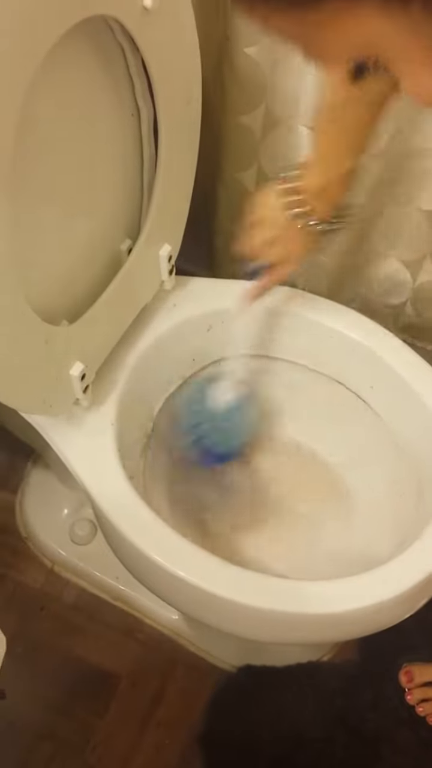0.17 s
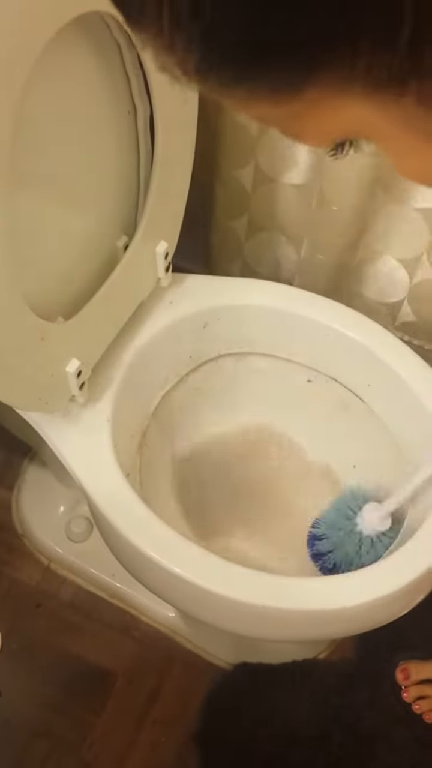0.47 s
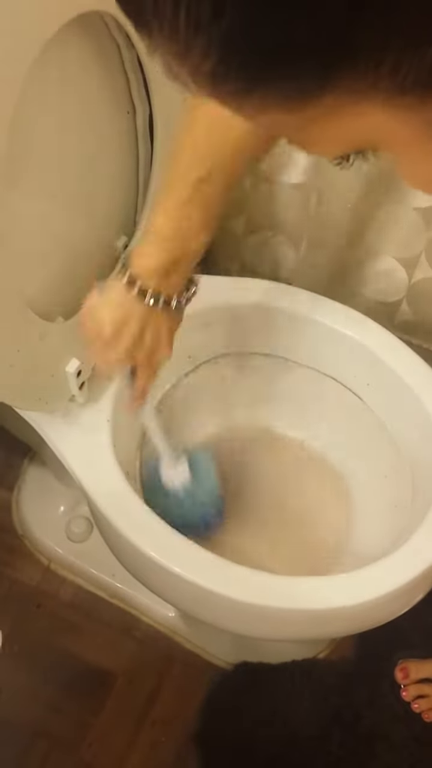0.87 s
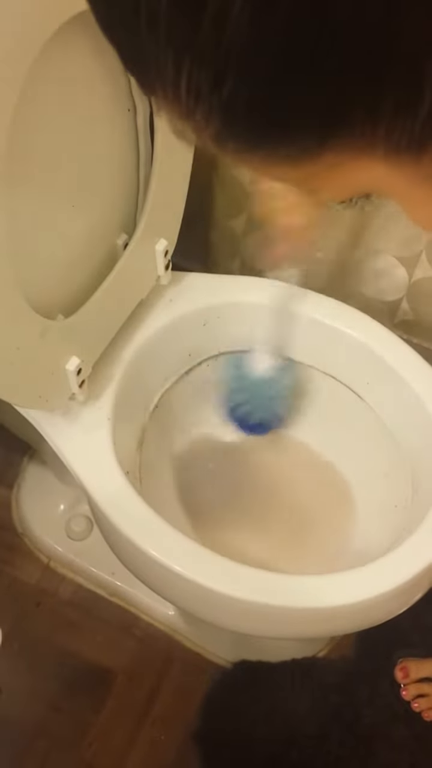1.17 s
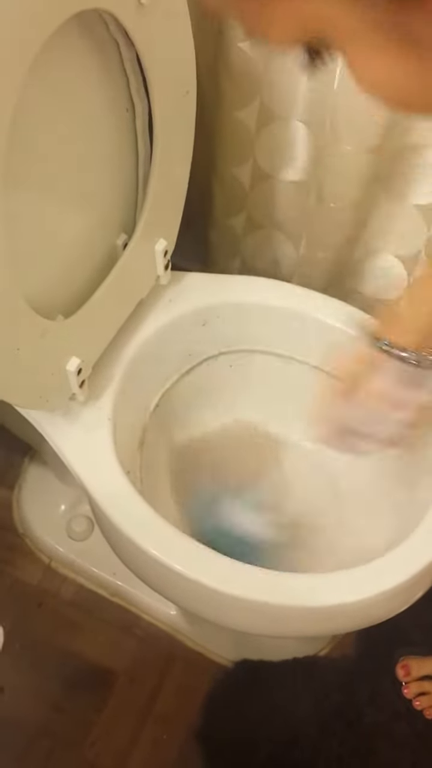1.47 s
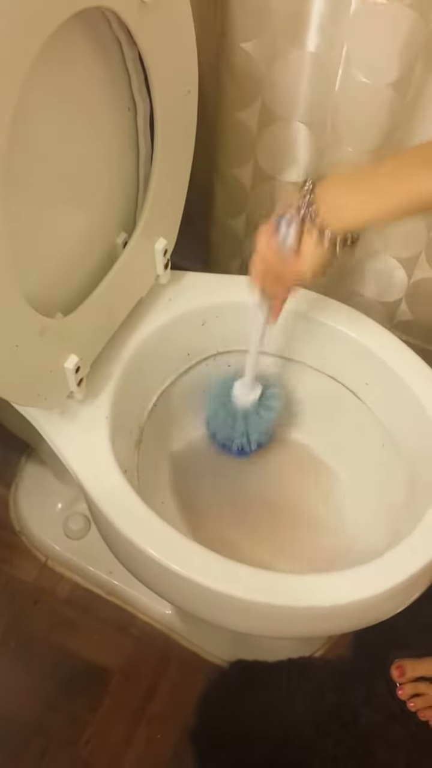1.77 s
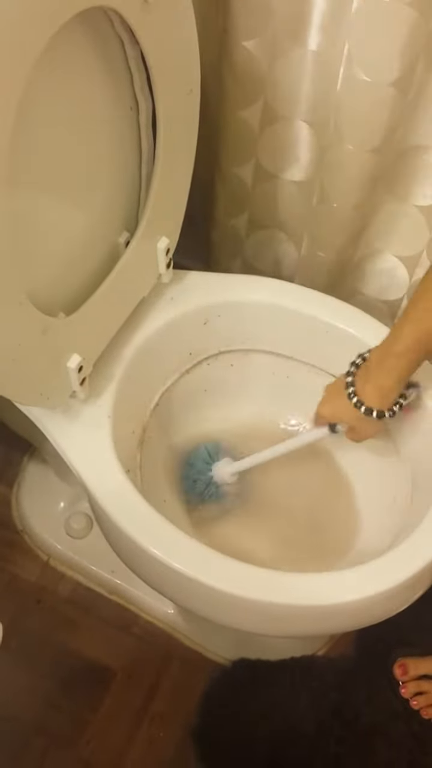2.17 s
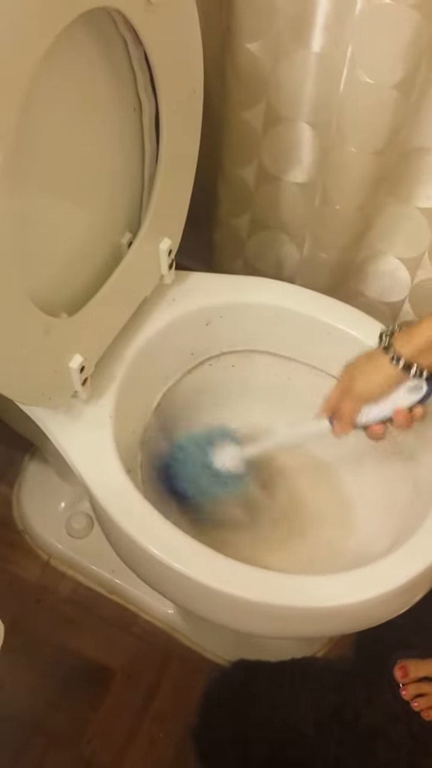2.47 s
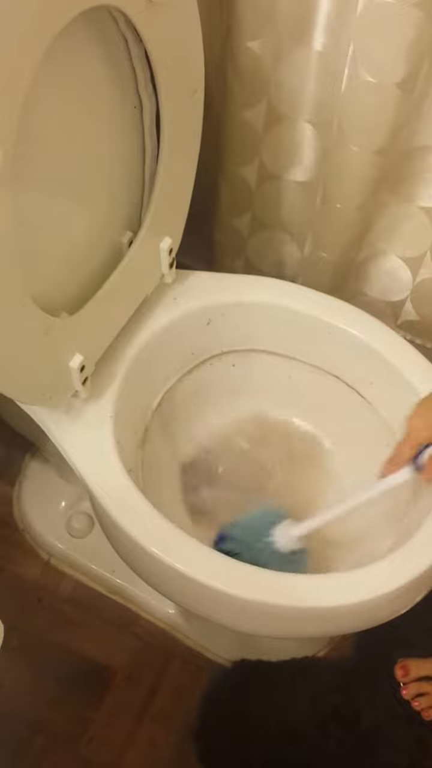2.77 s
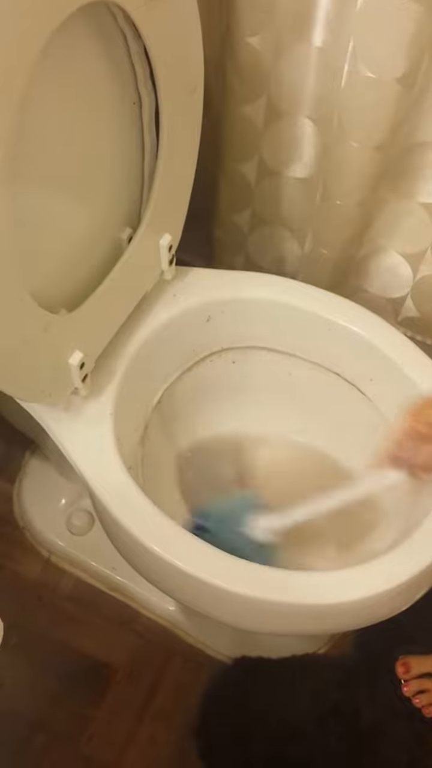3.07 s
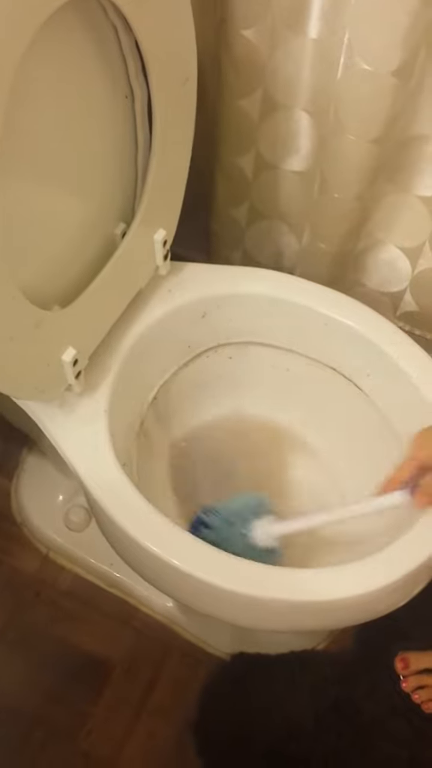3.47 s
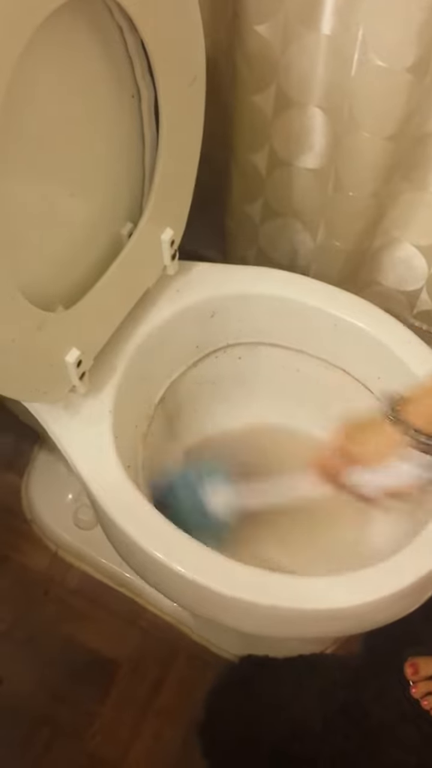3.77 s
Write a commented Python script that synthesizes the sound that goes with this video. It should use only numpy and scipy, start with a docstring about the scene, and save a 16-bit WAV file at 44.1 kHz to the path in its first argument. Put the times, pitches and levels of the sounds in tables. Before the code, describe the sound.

A stiff toilet brush scrubs a wet porcelain bowl, crisp hissing strokes with early knocks, softer in the middle, then stronger and steadier; small tiled bathroom, fan drone, close phone microphone.

```python
"""Over a fan's drone, a stiff brush scrubs a wet porcelain toilet bowl in a small bathroom.
Thousands of random bristle flicks a second hiss, scrape and ring tuned bowl modes, stroke by stroke.
Rising blips wet the strokes; knocks clack, splash and ring; shaped noise makes the sloshes and fan air.
A decaying noise tail is the room. The phone's left microphone faces away: later and much duller."""
import sys
import numpy as np
from scipy import signal
from scipy.fft import rfft, irfft, next_fast_len
from scipy.io import wavfile
from scipy.ndimage import uniform_filter1d

SR = 44100
rng = np.random.default_rng(int(sys.argv[2]) if len(sys.argv) > 2 else 0)


def log_audio(samples):
    """Write samples as a 16-bit WAV file to the path given in sys.argv[1]."""
    # one column per channel
    frames = np.atleast_2d(samples).T
    # limit to full scale, then quantise
    limited = np.clip(frames, -1, 1)
    pcm = np.round(limited * 32767).astype(np.int16)
    wavfile.write(sys.argv[1], SR, pcm)


def elevation(decibels):
    """Turn decibel levels (scalar or array-like) into linear amplitude ratios."""
    levels = np.asarray(decibels, float)
    return 10 ** (levels / 20)


N = 172431  # length in samples

# Brush strokes: peak_s, rise_s, fall_s, hiss_db, sizzle_over_hiss_db, scrape_db,
# middle_bowl_modes_db, outer_bowl_modes_db
STROKES = [(.03, 0.23, 0.15, -30.5, 4, -40.5, -55, -43.5), (.19, 0.035, 0.24, -41, 3, -48.5, -53, -48),
           (.42, 0.077, 0.07, -29, -0.5, -35.5, -38.5, -38), (.62, 0.099, 0.15, -44.5, 2, -52, -47, -51),
           (0.701, 0.052, 0.13, -32.5, 2, -39, -47, -62), (.845, .05, .05, -30.5, 3, -36.5, -60, -47),
           (.92, 0.079, 0.1, -34.5, 2, -40, -51, -60), (1.0, 0.1, 0.033, -59, 0, -47, -36.5, -49),
           (1.109, 0.082, 0.048, -30, 4, -33, -50, -42), (1.21, 0.091, 0.079, -37, -8, -38.5, -52, -44),
           (1.301, 0.098, 0.065, -28, -9, -37.5, -40.5, -51), (1.41, 0.037, 0.075, -39, 5.5, -55, -44, -45),
           (1.55, 0.074, 0.17, -34.5, -0.5, -40, -37, -50),
           (1.659, 0.15, 0.093, -35.5, 5.5, -41.5, -56, -43), (1.9, 0.033, 0.15, -45, 2.5, -72, -64, -61),
           (2.02, 0.037, 0.031, -41, -6, -37, -44, -63), (2.1, 0.076, 0.013, -40.5, -21, -42, -50, -56),
           (2.179, 0.11, 0.057, -35.5, -25, -38, -40.5, -53), (2.31, 0.056, 0.031, -51, -7, -66, -56, -64),
           (2.43, 0.067, 0.053, -28, -3.5, -38, -53, -62), (2.64, 0.019, 0.071, -35, -20, -44, -48, -61),
           (2.741, 0.048, 0.17, -21.5, 0.5, -30, -42, -40), (2.83, 0.018, 0.032, -41, -12, -30.5, -52, -57),
           (3.002, 0.094, 0.052, -20.5, -3, -41, -37, -43),
           (3.131, 0.071, .11, -22.5, 0.5, -32.5, -38.5, -40),
           (3.34, 0.12, 0.087, -22, 3.5, -39.5, -43.5, -41),
           (3.482, 0.045, 0.13, -23.5, 0.5, -34, -40, -36.5), (3.711, 0.1, 0.074, -21.5, 5, -41, -44, -44),
           (3.85, 0.066, 0.12, -29, 7, -41, -43, -46)]


def unit(x):
    """Scales to rms 1."""
    return x / np.sqrt(np.mean(x ** 2))


def along(table, hz):
    """Reads (hz, value) points on a log frequency axis."""
    table = np.array(table)
    return np.interp(np.log(hz + 1), np.log(table[:, 0] + 1), table[:, 1])


def colour(x, gain):
    """Filters by a gain that is a function of frequency."""
    size = next_fast_len(N + SR // 4)
    hz = np.arange(size // 2 + 1) * SR / size
    return irfft(rfft(x, size) * gain(hz), size)[..., :N]


def bell(hz, centre_hz, octaves):
    """Band shape, bell-like on a log frequency axis."""
    return np.exp(-.5 * (np.log2((hz + 1) / centre_hz) / octaves) ** 2)


def walk(rate_hz):
    """Smoothly wandering random level, rms 1."""
    span = max(int(SR / rate_hz), 1)
    smooth = uniform_filter1d(rng.standard_normal(N), span)
    return unit(uniform_filter1d(smooth, span))


def flicks():
    """Bristles snap free at random moments, with random force and a fluttering level."""
    flicks_per_s, spread_db, flutter_db, flutter_hz = 22000, 1, 1, 60
    boost_db = spread_db * np.minimum(rng.exponential(size=N), 3)
    force = elevation(boost_db) * rng.standard_normal(N)
    happens = np.clip((flicks_per_s / SR - rng.random(N)) * 20, 0, 1)
    return force * happens * elevation(flutter_db * walk(flutter_hz))


def clumps(x):
    """Tufts catch unevenly: each third of an octave flickers on its own."""
    flicker_db, flicker_hz = 2.3, 22
    out = 0
    for centre_hz in 1000 * 2 ** np.arange(0, 4.2, 1 / 3):
        band = colour(x, lambda hz: bell(hz, centre_hz, 0.14))
        out = out + elevation(flicker_db * walk(flicker_hz)) * band
    return out


def pressure(table, *columns):
    """Each stroke swells and fades by 20 dB over its rise and fall; its level sums the given columns."""
    bend = 1.9  # 2 = bell-shaped, less = more pointed
    t, power = np.arange(0, N + 64, 64) / SR, 0
    for row in table:
        peak_s, rise_s, fall_s = row[:3]
        away = np.abs(t - peak_s) / np.where(t < peak_s, rise_s, fall_s)
        level_db = sum(row[c] for c in columns) - 20 * away ** bend
        power = power + elevation(np.maximum(level_db, -200)) ** 2
    return np.interp(np.arange(N) / SR, t, np.sqrt(power))


def bristles(splash):
    """Tips hiss and sizzle, wet tufts scrape; strokes and knock splashes set their levels."""
    # Spectra of the tips and of the tufts: hz, relative level in db per Hz
    hiss_colour = [(1470, -57), (2500, -13), (3130, -5.5), (3860, -8), (4160, -6), (4450, -7.5),
                   (6060, -4.5), (7470, 0), (10300, -4), (14000, -11), (15000, -8.5)]
    scrape_colour = [(1000, -31), (1400, -12), (1650, 2), (2400, 1), (3200, 2), (4200, -8), (6000, -7.5)]
    sizzle_above_hz = 9500
    tips = unit(clumps(colour(flicks(), lambda hz: elevation(along(hiss_colour, hz)))))
    sizzle = colour(tips, lambda hz: 1 / (1 + (sizzle_above_hz / (hz + 1)) ** 6))
    hiss = (tips - sizzle) * np.hypot(pressure(STROKES, 3), splash)
    hiss = hiss + sizzle * np.hypot(pressure(STROKES, 3, 4), elevation(-3) * splash)
    tufts = unit(clumps(colour(flicks(), lambda hz: elevation(along(scrape_colour, hz)))))
    return hiss + tufts * (pressure(STROKES, 5) + elevation(-12) * splash)


def ring(force, column):
    """Porcelain modes ring as decaying resonators; force(hz) is what pushes the mode of that pitch."""
    # Bowl modes: pitch_hz, relative knocked_db, relative brushed_db, t60_s
    modes = [(622, -2, -9.5, 0.12), (738.2, -13, 1, 0.18), (990, -2.5, -1, 0.045), (1346, -5, -4, 0.067),
             (1672, -17, -4.5, 0.11), (1880, -15, -7, 0.024), (2097, -21, -5.5, 0.11),
             (2156, -16, 0.5, .13), (2236, -19.5, 0, .17), (2835, -11, -14, 0.1), (3096, -15, -2, 0.15),
             (3360, -4, -35, .06), (4040, -31, -6, 0.068)]
    out = 0
    for k, mode in enumerate(modes):
        hz, t60_s = mode[0], mode[3]
        pole = np.exp(2j * np.pi * hz / SR - np.log(1000) / (t60_s * SR))
        tone = signal.lfilter([1], [1, -pole], force(hz)).imag
        out = out + (-1) ** k * elevation(mode[column]) * tone  # neighbours alternate in sign
    return out


def brushed_bowl():
    """Bristle flicks keep the bowl ringing, its middle and outer modes following separate levels."""
    middle_hz, drift_db, drift_hz = (1200, 2600), 2.5, 9.7
    rub, middle, outer = flicks(), pressure(STROKES, 6), pressure(STROKES, 7)

    def push(hz):
        level = middle if middle_hz[0] < hz < middle_hz[1] else outer
        return rub * level * elevation(drift_db * walk(drift_hz))

    steady = ring(lambda hz: rub, column=2)
    return ring(push, column=2) / np.std(steady)


def drops():
    """Tiny bubbles squeezed from the wet tufts: short rising blips under the scrape's pressure."""
    drops_per_s, low_hz, high_hz, cycles, glide = 220, 1600, 6500, 9, 0.25
    count = int(drops_per_s * N / SR)
    at, pitch, size = rng.random((count, 3)).T
    start_hz = low_hz * (high_hz / low_hz) ** pitch[:, None]
    step = np.arange(SR // 50)
    turns = start_hz * step / SR
    phase = 2 * np.pi * turns * (1 + glide * turns / cycles / 4)
    blip = np.sin(phase) * np.exp(-2 * turns / cycles)
    out = np.zeros(N + len(step))
    np.add.at(out, (at * N).astype(int)[:, None] + step, blip * elevation(8.7 * size[:, None]))
    return elevation(-9) * unit(out[:N]) * pressure(STROKES, 5)


def fan():
    """Extractor fan: broad air noise, most alike left and right in the bass, and wavering motor tones."""
    # Air spectrum: hz, relative level in db per Hz
    air_colour = [(15, -18), (30, -16), (50, -21), (62, -10.5), (85, 1), (125, -7.5), (170, -7),
                  (260, -8.5), (400, -17), (570, -17), (740, -15.5), (1170, -19), (1900, -20.5),
                  (2800, -23.5), (4500, -31), (8000, -26), (15000, -40)]
    # Motor tones: pitch_hz, waver_hz, level_db
    motor_tones = [(97, 4, -51), (119.5, 1.5, -51), (145.3, 1.2, -44), (240, 2, -52), (359, 2, -63)]
    # Likeness of left and right: hz, likeness (0-1)
    likeness = [(25, .9), (60, .99), (150, .98), (300, .82), (600, .7), (1200, .5), (4000, .1)]
    air_db = -42  # right channel
    own, right = rng.standard_normal((2, N))
    alike = lambda hz: np.clip(along(likeness, hz), 0, 1)
    left = colour(right, alike) + colour(own, lambda hz: np.sqrt(1 - alike(hz) ** 2))
    air = colour(np.array([left, right]), lambda hz: elevation(along(air_colour, hz)))
    out = air * elevation(air_db) / np.std(air[1])
    for pitch_hz, waver_hz, level_db in motor_tones:
        phase = 2 * np.pi * np.cumsum(pitch_hz + waver_hz * walk(11.22)) / SR
        out = out + elevation(level_db + 1.17 * walk(5.8)) * np.sqrt(2) * np.sin(phase)
    return out


def knocks():
    """Each blow of the brush head rattles on the bowl, clacks the plastic and splashes the bristles."""
    # Knocks and slaps: start_s, bowl_drive_db, splash_db, splash_t60_s, clack_db, clack_hz, clack_t60_s
    blows = [(.161, -70, -30.5, 0.12, -34, 6100, 0.048), (0.2684, -65, -48, .05, -30, 2520, .07),
             (.286, -54, -55, .05, -39, 2500, .05), (0.3214, -35, -28, 0.074, -20.5, 2900, 0.081),
             (.322, -80, -37, 0.036, -26.5, 1315, 0.041), (.322, -80, -45, 0.036, -27, 7070, 0.041),
             (1.952, -66, -29.5, 0.37, -31.5, 7900, 0.071), (2.139, -68, -40, 0.031, -36, 3270, 0.099),
             (2.304, -80, -39, .05, -49, 6900, 0.035), (2.362, -80, -44, .08, -42, 7300, 0.055),
             (2.565, -80, -49, 0.098, -39, 7500, 0.079), (2.592, -45, -23.5, 0.093, -22, 7550, 0.092),
             (2.606, -58, -32, 0.17, -28.5, 5260, 0.17), (2.68, -55, -48, .05, -36, 3480, 0.078),
             (3.268, -64.5, -20, 0.12, -31, 3130, .08), (3.445, -71, -35, 0.11, -53, 2500, .05)]
    contact_s, splash_rise_s, clack_width_oct, tone_fade_s = 0.0042, .002, 0.18, 0.0072
    t, rattle = np.arange(N) / SR, rng.standard_normal(N)
    splash, contact, clack = np.zeros((3, N))
    for start_s, drive_db, splash_db, splash_t60_s, clack_db, clack_hz, clack_t60_s in blows:
        since = np.maximum(t - start_s, 0)
        struck = t > start_s
        splash += np.minimum(since / splash_rise_s, 1) * elevation(splash_db - 60 * since / splash_t60_s)
        contact += struck * elevation(drive_db) * np.exp(-since / contact_s) * (1 + rattle)
        noise = unit(colour(rattle, lambda hz: bell(hz, clack_hz, clack_width_oct)))
        tone = 1.5 * np.sin(2 * np.pi * clack_hz * since) * np.exp(-since / tone_fade_s)
        clack += struck * elevation(clack_db - 60 * since / clack_t60_s) * (noise + tone)
    force = np.diff(contact, prepend=0) * 2.36
    return splash, clack + ring(lambda hz: force, column=1)


def slosh():
    """Dull gurgle of water shoved by the brush: unsteady noise in a low band."""
    # Water pushed about: peak_s, rise_s, fall_s, level_db
    shoves = [(.36, 0.027, 0.075, -42), (.86, 0.089, 0.078, -45), (1.11, .06, 0.078, -45),
              (2.02, 0.054, 0.047, -46), (2.17, 0.036, 0.047, -42), (2.62, .03, 0.05, -48)]
    # Gurgle spectrum: hz, relative level in db per Hz
    water_colour = [(250, -33), (350, 0), (700, 0.5), (1050, 3.5), (1500, -4), (2200, -35)]
    gurgle = flicks() * elevation(3 * walk(40))
    return unit(colour(gurgle, lambda hz: elevation(along(water_colour, hz)))) * pressure(shoves, 3)


def room(near):
    """Tiled-room reverberation: a separate decaying noise tail for left and right."""
    t60_s, gap_s = 0.21, .002
    t = np.arange(SR // 2) / SR
    tail = rng.standard_normal((2, len(t))) * elevation(-60 * t / t60_s) * (t > gap_s)
    tail = tail / np.sqrt(np.sum(tail ** 2, axis=1, keepdims=True))
    return signal.fftconvolve(near[None], tail, axes=1)[:, :N]


def scene():
    """Brush, tiled room and fan, as they reach left and right."""
    splash, struck = knocks()
    near = bristles(splash) + brushed_bowl() + drops() + struck + slosh()
    echo = room(near)
    left = elevation(-6) * near + elevation(-2) * echo[0]
    right = near + elevation(-7) * echo[1]
    return np.array([left, right]) + fan()


def band_limit(x):
    """A steep low-pass at the top of the band."""
    return signal.sosfilt(signal.butter(12, 15850, fs=SR, output="sos"), x)


def record(dry):
    """The left microphone is late and shaded in the treble; both hiss faintly; the top is cut."""
    # Shading of the left microphone: hz, gain_db
    left_shade = [(60, 3.5), (200, -2), (380, -0.5), (700, -4), (1290, -7), (2000, -12), (3300, -14.5),
                  (3800, -36), (5500, -29), (8120, -66), (15000, -46)]
    # Lateness of the left microphone: hz, phase lag in radians
    left_late = [(20, 0), (60, .15), (120, .4), (300, .8), (780, 1.5), (1640, 2.6), (3100, 3.7), (7000, 7),
                 (15000, 18)]
    mic_noise_db, top_hz = -60, 14370
    left = colour(dry[0], lambda hz: elevation(along(left_shade, hz)) * np.exp(-1j * along(left_late, hz)))
    both = np.array([left, dry[1]]) + elevation(mic_noise_db) * rng.standard_normal((2, N))
    low_pass = signal.ellip(8, .2, 50, top_hz, fs=SR, output="sos")
    return band_limit(signal.sosfiltfilt(low_pass, both))


dry = scene()
out = record(dry)
log_audio(out)
```